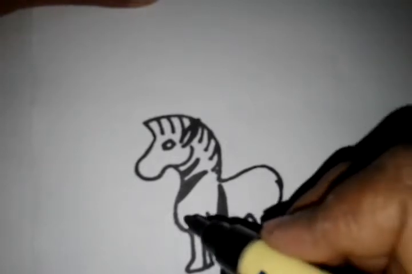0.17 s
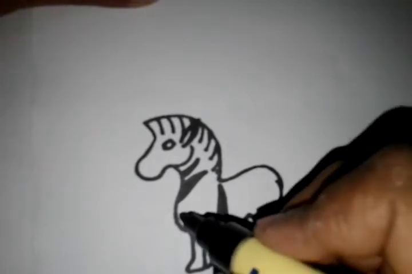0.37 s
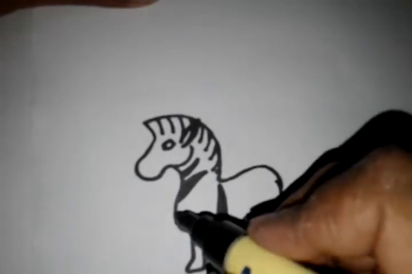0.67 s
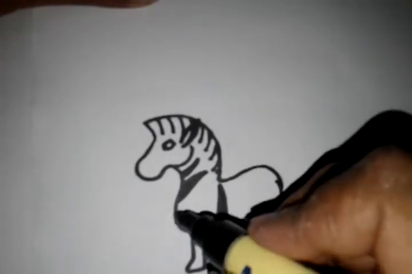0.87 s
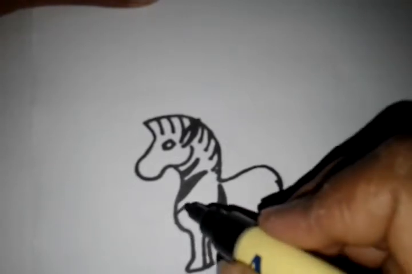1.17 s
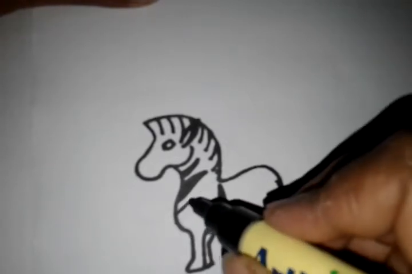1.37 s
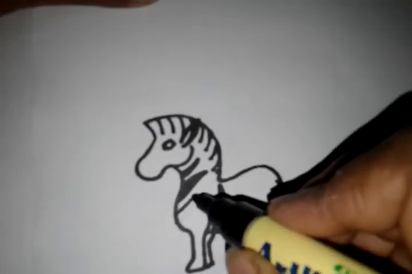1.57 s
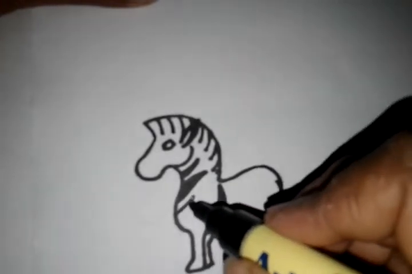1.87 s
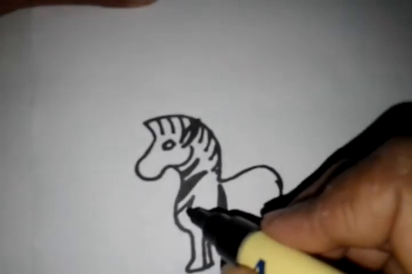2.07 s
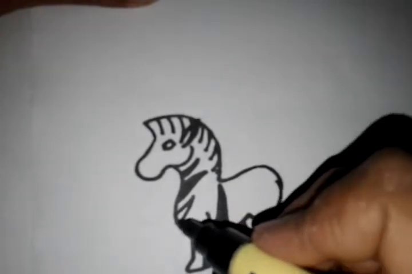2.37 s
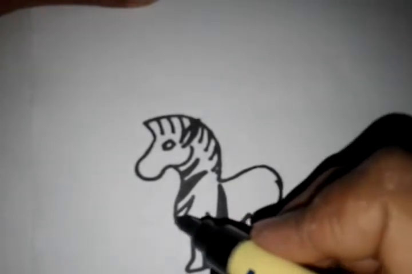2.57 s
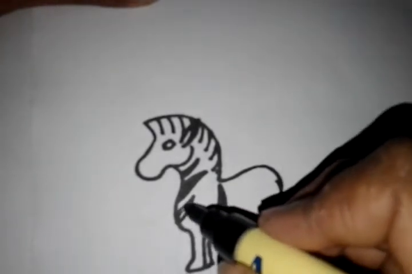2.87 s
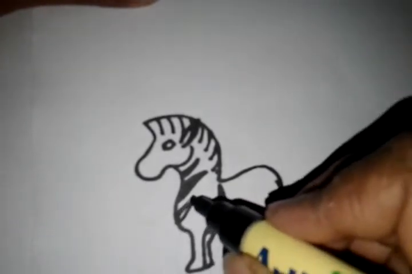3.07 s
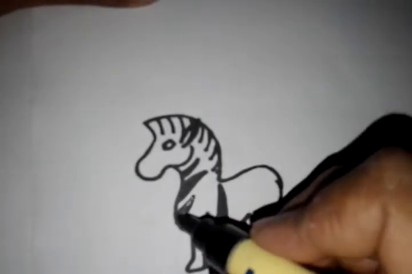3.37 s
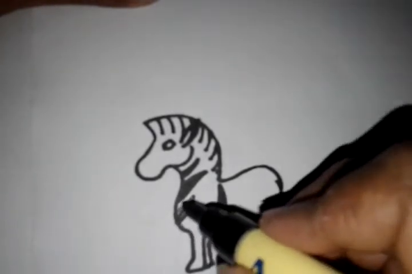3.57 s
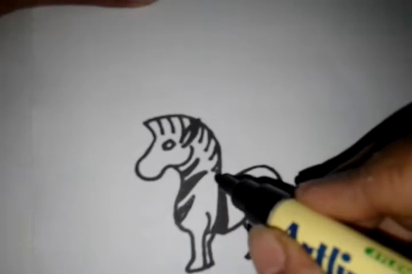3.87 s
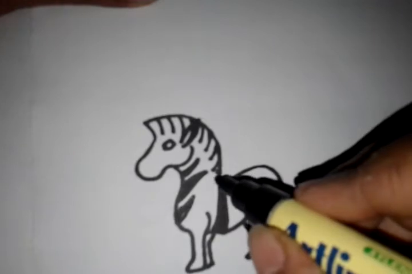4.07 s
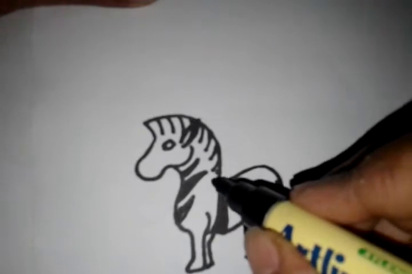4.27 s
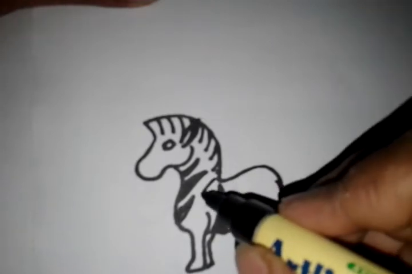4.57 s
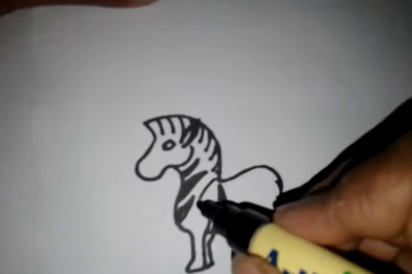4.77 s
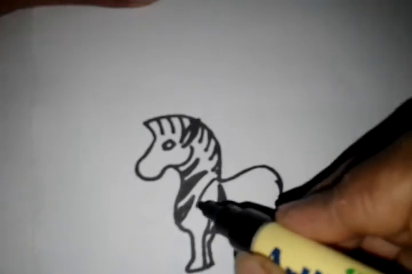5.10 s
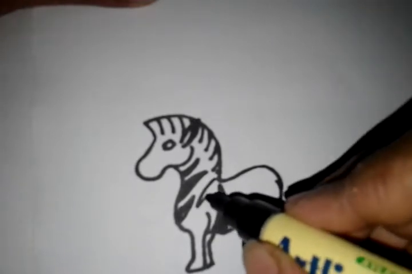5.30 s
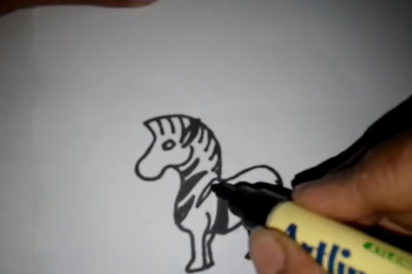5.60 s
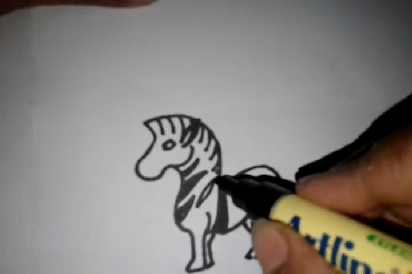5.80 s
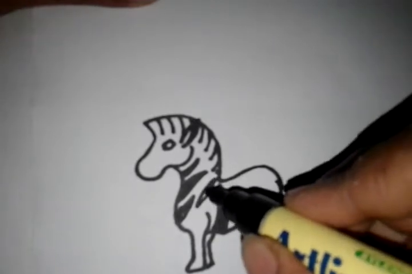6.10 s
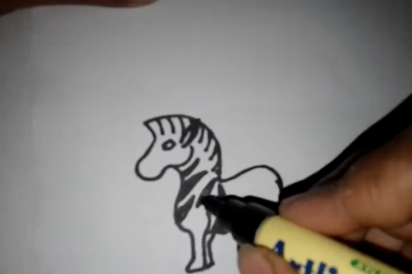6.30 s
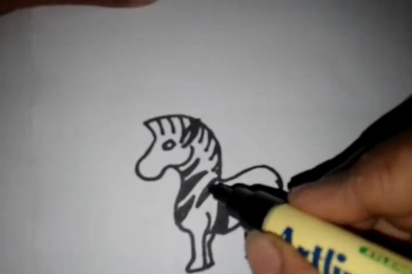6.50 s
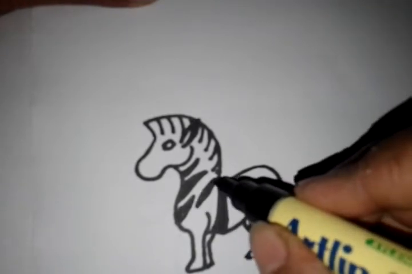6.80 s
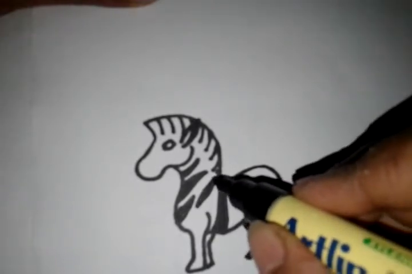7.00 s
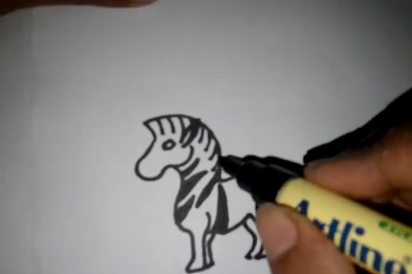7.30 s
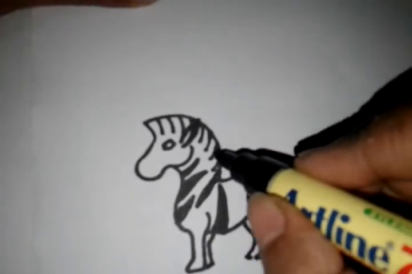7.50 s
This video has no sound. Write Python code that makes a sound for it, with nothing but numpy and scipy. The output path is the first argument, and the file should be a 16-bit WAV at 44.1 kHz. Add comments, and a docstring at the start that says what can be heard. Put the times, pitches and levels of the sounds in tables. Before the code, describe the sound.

Close, raspy little strokes of a felt pen on paper, with light nib ticks, in a quiet room with a fading engine hum.

```python
"""In a quiet room, close to one microphone, a felt marker fills in a drawing with quick short strokes.
Stick-slip friction of the nib on paper fibres excites the resonances of pen and sheet and rumbles in the
desk; the nib ticks when it lands or snags. Now and then the hand slides over the sheet or bumps the desk.
Behind it the harmonics of a distant engine hum and die away over the room tone."""
import sys
import numpy as np
from scipy import signal
from scipy.fft import rfft, irfft
from scipy.io import wavfile
from scipy.ndimage import uniform_filter1d

SR = 44100
rng = np.random.default_rng(int(sys.argv[2]) if len(sys.argv) > 2 else 0)


def wav_out(sig):
    """Save sig, one row per channel (or a flat mono array), as 16-bit PCM at SR to the path in sys.argv[1]."""
    wavfile.write(sys.argv[1], SR, np.round(np.clip(np.atleast_2d(sig).T, -1, 1) * 32767).astype(np.int16))


N = 337363
T = np.arange(N) / SR
FREQS = np.arange(2049) * SR / 4096


# modes of pen and sheet, hand low on the page: (frequency [Hz], bandwidth [Hz], relative level [dB])
MODES_HAND_LOW = [(2260, 430, -21), (2940, 340, -9), (3240, 500, -15), (4066, 410, -14.5),
                  (4950, 340, -6.5), (5740, 570, -4.5), (6100, 310, -1), (7170, 780, -7), (7800, 330, 0),
                  (8340, 370, -5), (8860, 300, -8), (9180, 350, -5), (9930, 480, -11.5), (10660, 980, -16),
                  (12000, 900, -19.5), (14400, 2700, -26)]
# the same with the hand moved up the page: (frequency [Hz], bandwidth [Hz], relative level [dB])
MODES_HAND_HIGH = [(2710, 250, -13), (3020, 350, -11.5), (3330, 300, -18), (3980, 500, -16),
                   (4875, 360, -5), (5656, 340, 0.5), (5940, 340, -0.5), (7130, 570, -6), (7720, 540, 1.5),
                   (8360, 410, -8.5), (8840, 370, -3.5), (9680, 380, -7.5), (10360, 440, -10.5),
                   (11500, 660, -17.5), (12290, 450, -19), (13800, 3600, -25.5)]
# response of the desk under the sheet: (frequency [Hz], relative level [dB])
DESK_RESPONSE = [(60, -23), (150, 1.5), (300, 4.5), (480, 3), (650, -2), (980, -5.5), (1320, 2), (1800, -4),
                 (2300, -3), (3600, -27), (9000, -36)]

def marker():
    """Forced vibration: slips and ticks ring pen and sheet, and the slips also drive the desk."""
    envelope = stroke_envelope()
    desk_db, rasp_db = stroke_touch()
    speed = envelope * undb(33.5)  # 1 in an ordinary stroke
    friction = stick_slip(per_second=5000, spread_db=2.0, rub_db=-0.5, uneven_db=0.89)
    force = friction * envelope + nib_ticks()
    dull = lowpass(force, 7500)
    force = dull + (force - dull) * (0.63 + 0.26 * np.sqrt(speed))  # faster strokes are brighter
    hand_high = T > 3.9  # the hand moves up the page
    pen = undb(0.96) * ring(force * ~hand_high, resonances(MODES_HAND_LOW))
    pen += undb(0.56) * ring(force * hand_high, resonances(MODES_HAND_HIGH))
    rasp = lowpass(pen, 3900, order=4)
    # the desk feels the weight of the hand, which changes less than the speed
    weight = speed ** 0.76 * undb(desk_db)
    rumble = weight * ring(friction, spectrum(DESK_RESPONSE))
    return pen + rasp * (undb(rasp_db) - 1) + rumble


def stick_slip(per_second, spread_db, rub_db, uneven_db):
    """Stick-slip friction: fibres snap free, most small and a few large, over a rub on uneven paper."""
    snaps = (rng.random(N) < per_second / SR) * rng.standard_normal(N)
    snaps *= undb(spread_db * np.minimum(rng.exponential(size=N), 5))
    rub = undb(rub_db) * rng.standard_normal(N)
    return unit((unit(snaps) + rub) * undb(uneven_db * wander(170)))


# strokes of the nib: (start [s], duration [s], relative scratch level [dB], rise from start to end [dB],
# desk rumble at ordinary speed [dB], gain of the rasp near 3 kHz [dB])
NIB_STROKES = [(0.911, 0.073, -38, 1.5, -47.5, 3.0), (0.992, 0.063, -47.0, 0.0, -45, 0.0),
               (1.058, 0.097, -39.0, 3, -45, 2.5), (1.209, 0.079, -44, 7.5, -46, 2),
               (1.294, 0.077, -37.5, -6.5, -48, 1), (1.425, 0.113, -41.5, 8, -46, 2.5),
               (1.733, 0.11, -34.5, -8, -46.5, -6), (1.857, 0.117, -38, -3.5, -45.5, -2.5),
               (2.009, 0.12, -39.5, 4.5, -45.5, 1.0), (2.136, 0.12, -39, 8, -46, -2),
               (2.26, 0.13, -40.5, 8.5, -47.5, 2.5), (2.5, 0.071, -38.0, -2, -46, -7),
               (2.725, 0.12, -31.5, 2.5, -51, -2), (2.853, 0.17, -34.0, -8.5, -47.5, -2),
               (3.129, 0.18, -30.5, 1.5, -49.5, -3), (3.397, 0.14, -38.5, 12, -52, -4.5),
               (4.163, 0.081, -48, 9, -45, 1.0), (4.236, 0.051, -37, -12, -47, 1),
               (4.301, 0.15, -35, 13.5, -48.5, 1), (4.471, 0.034, -39.0, 8, -47.5, 0.5),
               (4.52, 0.18, -36, 4.5, -50, 2), (4.697, 0.08, -39, 9.5, -47.5, 0),
               (4.79, 0.092, -45.5, 11, -48, 1), (5.064, 0.081, -36.5, -1, -45, 3.5),
               (5.164, 0.21, -34, 3.5, -46, 1.5), (5.39, 0.057, -41, 13, -48, 3),
               (5.46, 0.11, -34.5, -3, -48.5, 1), (5.642, 0.015, -27.5, 6, -49, 3),
               (5.661, 0.064, -29.0, -6.5, -47, -1), (5.747, 0.054, -40.5, 13, -48.5, -3),
               (5.898, 0.029, -38.5, 11.0, -51.5, -1), (5.933, 0.077, -37.0, 1, -46, 2.0),
               (5.997, 0.101, -32, -3, -46.5, 1), (6.09, 0.11, -30.5, -1, -48, -3),
               (6.356, 0.095, -27.0, -1, -51, -2), (6.434, 0.24, -36.0, -11.0, -47, 1.5),
               (6.778, 0.075, -42.5, 1, -39.5, 4.5), (6.848, 0.066, -38, -3, -43, 3),
               (6.987, 0.085, -30.0, 5.5, -50, -1.5)]

def stroke_envelope():
    """Friction noise grows with speed: each stroke rises, arches as it gains or loses pace, and lifts."""
    longest_attack_s, longest_release_s, arch_db = 0.024, 0.041, 3
    out = np.zeros(N)
    for start, duration, db, rise_db, *_ in NIB_STROKES:
        span = slice(int(start * SR), int((start + duration + 4 * longest_release_s) * SR))
        age = np.maximum(T[span] - start, 0)
        along = np.minimum(age / duration, 1) - .5  # 0 at mid-stroke
        attack = np.minimum(age / min(longest_attack_s, duration / 2), 1)
        release_s = min(longest_release_s, duration / 2)
        lift = np.exp(-(np.maximum(age - duration, 0) / release_s) ** 2)
        arch = undb(db + rise_db * along - arch_db * (2 * along) ** 2)
        out[span] = np.maximum(out[span], attack * lift * arch)
    return out


def stroke_touch():
    """Linear interpolation: desk rumble and rasp, in dB, glide from one mid-stroke to the next."""
    start, duration, _, _, desk_db, rasp_db = np.transpose(NIB_STROKES)
    return [np.interp(T, start + duration / 2, db) for db in (desk_db, rasp_db)]


# the nib lands or snags: (time [s], relative level [dB], decay time [s])
NIB_IMPACTS = [(1.083, -34, 0.0033), (1.4474, -29, 0.0075), (1.745, -42, 0.0043), (2.0325, -21.5, 0.0011),
               (2.507, -36, .004), (2.533, -28, 0.0044), (3.434, -29, 0.0047), (4.177, -38, 0.004),
               (5.103, -32, 0.0036), (5.117, -27, 0.0032), (5.442, -24.5, .003), (5.652, -27, 0.0045),
               (5.71, -25, 0.0016), (5.799, -25, .002), (6.424, -20, 0.0022), (6.443, -20, 0.0025),
               (6.479, -31, 0.00092), (6.783, -38, 0.004)]

def nib_ticks():
    """Impulsive excitation: a sharp push and a dying crunch; so brief a contact holds mostly treble."""
    out = np.zeros(N)
    age = np.arange(int(.03 * SR)) / SR
    for time, db, decay_s in NIB_IMPACTS:
        crunch = rng.standard_normal(len(age)) * np.exp(-age / decay_s)
        crunch[0] = 4  # the push
        start = int(time * SR)
        out[start:start + len(age)] += undb(db) * crunch
    return signal.sosfilt(signal.butter(2, 4800, "highpass", fs=SR, output="sos"), out)


# the side of the hand slides on the paper: (centre time [s], half-width [s], level [dB])
HAND_SLIDES = [(.05, 0.074, -40), (.6, 0.79, -58), (3.72, 0.14, -53), (7.4, 0.068, -45.5)]
# hiss of skin on paper: (frequency [Hz], relative level [dB])
SKIN_SPECTRUM = [(300, -16), (2200, -12), (4000, -16), (5500, -11), (6900, -1), (7700, 1), (8800, -5),
                 (9700, -10), (15000, -23)]
# the heel of the hand bumps the desk: (time [s], level [dB])
HAND_BUMPS = [(3.363, -43), (3.419, -39), (3.74, -45), (3.829, -41), (6.458, -51), (7.283, -38),
              (7.565, -45)]

def hand():
    """Sliding friction makes skin hiss on paper; each bump sets off a damped oscillation of the desk."""
    sliding = sum(undb(db) * swell(centre, half_width) for centre, half_width, db in HAND_SLIDES)
    out = sliding * ring(rng.standard_normal(N), spectrum(SKIN_SPECTRUM))
    thud_hz, decay_s = 175, .012
    for time, db in HAND_BUMPS:
        age = np.maximum(T - time, 0)
        out += undb(db) * np.sin(2 * np.pi * thud_hz * age) * np.exp(-age / decay_s)
    return out


# course of the distant engine: (time [s], firing rate [Hz], relative level [dB])
ENGINE_COURSE = [(0, 54.8, -40), (.7, 55.2, -38), (1.2, 56, -39), (1.6, 56.8, -43), (2, 57, -48.5),
                 (2.3, 53, -48), (2.8, 49.5, -51.5), (3.3, 48, -75)]
# its harmonics: (multiple of the firing rate [-], relative level [dB])
ENGINE_HARMONICS = [(2, -15.5), (3, -5), (4, -3), (5, -14.5), (6, -20.5), (7, -28.5), (8, -25), (9, -25.5)]
# its soft rush: (frequency [Hz], relative level [dB])
RUSH_SPECTRUM = [(120, -11), (400, 3), (750, -1.5), (1500, -5), (2300, -0.5), (3500, -11.5), (9000, -18.5)]

def engine():
    """Periodic firing makes a harmonic series; its low orders pass the walls, wavering, with a rush."""
    times, *columns = np.transpose(ENGINE_COURSE)
    firing_hz, db = (np.interp(T, times, column) for column in columns)
    cycles = np.cumsum(firing_hz * (1 + 0.00321 * wander(9.16))) / SR
    hum = np.zeros(N)
    for order, order_db in ENGINE_HARMONICS:
        hum += undb(order_db + wander(6.7)) * np.sin(2 * np.pi * (round(order) * cycles + rng.random()))
    rush = undb(0.59 * db - 30.5) * ring(rng.standard_normal(N), spectrum(RUSH_SPECTRUM))
    return np.sqrt(2) * undb(db) * hum + rush


# broad shape of the room tone: (frequency [Hz], relative level [dB])
ROOM_SPECTRUM = [(25, -38), (42, -20), (68, -1.5), (105, -14), (155, 0), (225, -1), (330, -7), (650, -18.5),
                 (1600, -20.5), (3900, -24), (6000, -19), (7500, -14), (9800, -24), (16000, -23.5)]
# narrow peaks in it: (frequency [Hz], bandwidth [Hz], relative level [dB])
ROOM_PEAKS = [(2205, 230, -18), (5020, 250, -16)]

def room_tone():
    """Broadband ambient noise: steady in the treble, restless in the bass."""
    tone = ring(rng.standard_normal(N), np.hypot(spectrum(ROOM_SPECTRUM), resonances(ROOM_PEAKS)))
    bass = lowpass(tone, 450)
    return undb(-46.5) * (tone - bass + bass * undb(wander(7.7)))


# faint low tones: (frequency [Hz], centre time [s], half-width [s], level [dB])
LOW_TONES = [(146.8, 2.75, 0.91, -55), (76, 4, 0.098, -51), (226, 4.64, 0.29, -48.5), (415, 6.13, 1.2, -56),
             (156, 6.26, 1.7, -52.5), (208, 7.3, 0.63, -50.5), (420, 7.55, 0.31, -57.5)]

def drones():
    """Random frequency and amplitude modulation: faint tones waver as they come and go."""
    out = np.zeros(N)
    for hz, centre, half_width, db in LOW_TONES:
        cycles = np.cumsum(hz * (1 + .022 * wander(16))) / SR
        out += undb(db + 3.3 * wander(9)) * swell(centre, half_width) * np.sin(2 * np.pi * cycles)
    return out


# wisps of hiss: (centre time [s], half-width [s], frequency [Hz], bandwidth [Hz], level [dB])
HISS_BANDS = [(.8, 4.5, 3310, 70, -65.5), (.2, 0.093, 8560, 800, -50.5), (.65, 0.46, 6500, 250, -55.5),
              (2.633, 0.096, 8600, 800, -50.5), (5.86, 0.065, 8500, 800, -51.5),
              (6.91, 0.064, 8700, 800, -47)]

def wisps():
    """Narrow-band noise has a trace of pitch: thin, whistly hisses swell and fade."""
    out = np.zeros(N)
    for centre, half_width, hz, bandwidth, db in HISS_BANDS:
        band = ring(rng.standard_normal(N), resonances([(hz, bandwidth, 0)]))
        out += undb(db) * swell(centre, half_width) * band
    return out


def undb(db):
    """Amplitude ratio of a level in decibels."""
    return 10 ** (np.asarray(db) / 20)


def unit(x):
    """Normalisation to an rms of 1."""
    return x / np.sqrt(np.mean(x ** 2))


def wander(rate_hz):
    """Smooth random fluctuation of rms 1, with about rate_hz new values a second."""
    hold = max(int(SR / rate_hz), 1)
    steps = np.repeat(rng.standard_normal(N // hold + 1), hold)
    return unit(uniform_filter1d(steps, hold)[:N])


def swell(centre, half_width):
    """Gaussian envelope, down to 1/e at half_width from its centre."""
    return np.exp(-((T - centre) / half_width) ** 2)


def spectrum(points):
    """Gain over FREQS, interpolated in log frequency between (frequency [Hz], level [dB]) points."""
    hz, db = np.transpose(points)
    return undb(np.interp(np.log(FREQS + 1), np.log(hz), db))


def resonances(modes):
    """Gain over FREQS of steep-sided resonances that add in power."""
    gains = (undb(db) / (1 + (2 * (FREQS - hz) / bandwidth) ** 2) for hz, bandwidth, db in modes)
    return np.sqrt(sum(gain ** 2 for gain in gains))


def ring(x, gain):
    """Convolution with the minimum-phase, unit-energy impulse response shaped by this gain."""
    cepstrum = irfft(np.log(gain + 1e-6))
    half = len(cepstrum) // 2
    cepstrum[1:half] *= 2  # folding onto positive time makes the response causal
    cepstrum[half + 1:] = 0
    response = irfft(np.exp(rfft(cepstrum)))
    return signal.fftconvolve(x, response / np.linalg.norm(response))[:N]


def lowpass(x, hz, order=2):
    """Zero-phase low-pass filter: subtracting its output from x leaves the treble."""
    return signal.sosfiltfilt(signal.butter(order, hz, fs=SR, output="sos"), x)


def scene():
    """Superposition: all sources add at one microphone, which feeds both channels."""
    return np.tile(marker() + hand() + engine() + room_tone() + drones() + wisps(), (2, 1))


def record(dry):
    """Band limiting: a steep low-pass filter cuts the highest treble."""
    cutoff_hz = 15800
    return signal.sosfilt(signal.ellip(10, .1, 70, cutoff_hz, fs=SR, output="sos"), dry)


dry = scene()
out = record(dry)
wav_out(out)
```